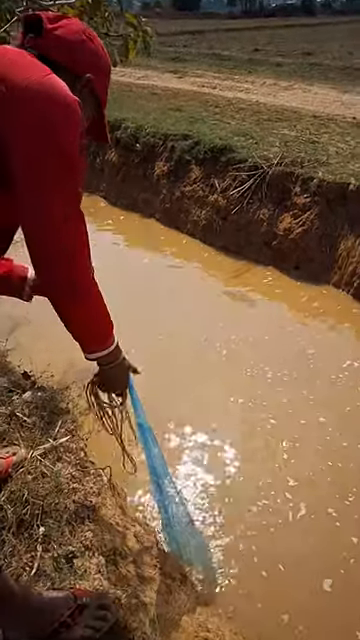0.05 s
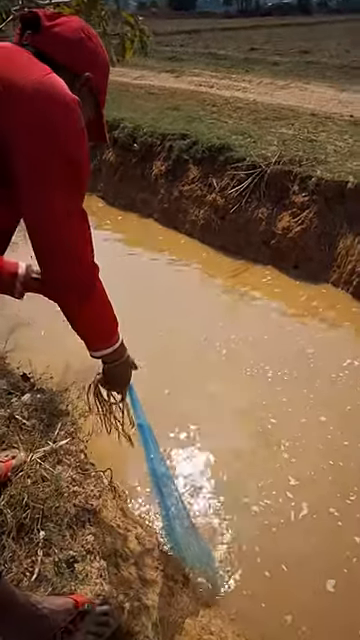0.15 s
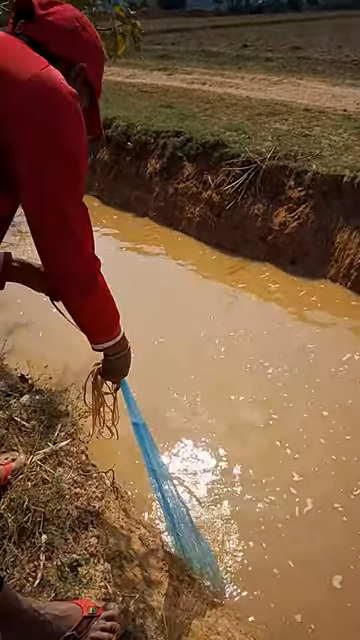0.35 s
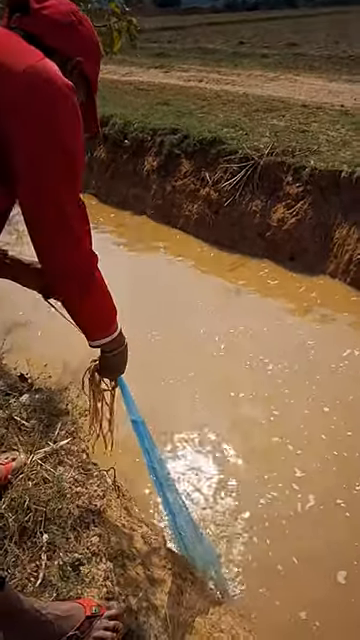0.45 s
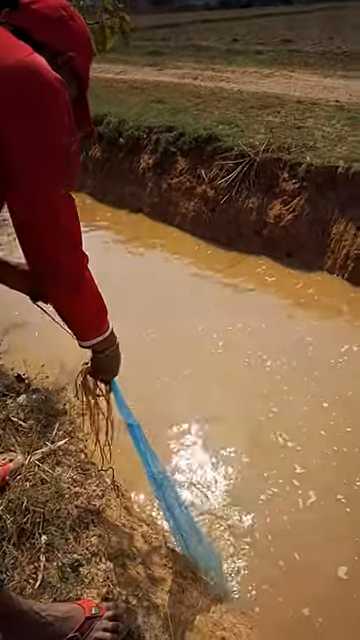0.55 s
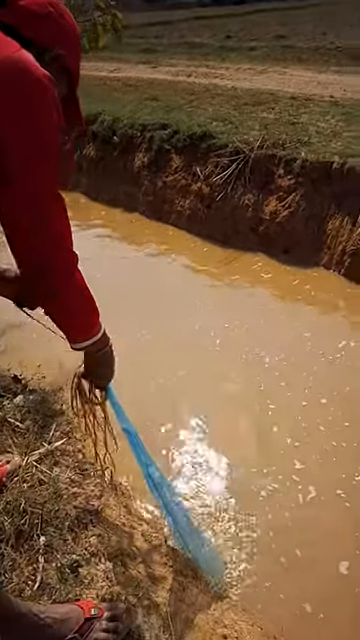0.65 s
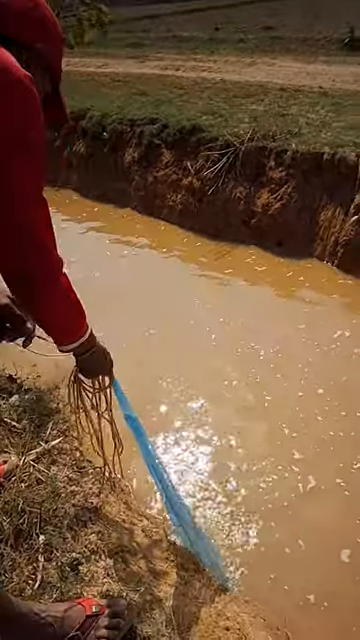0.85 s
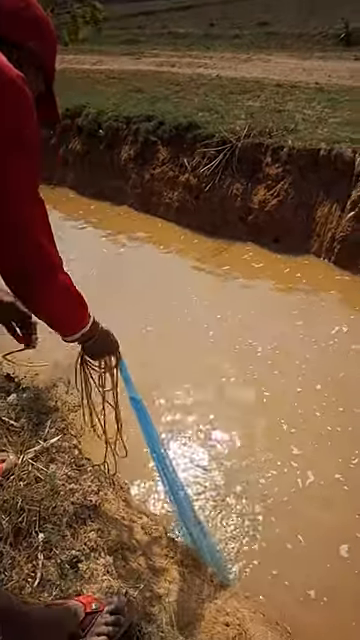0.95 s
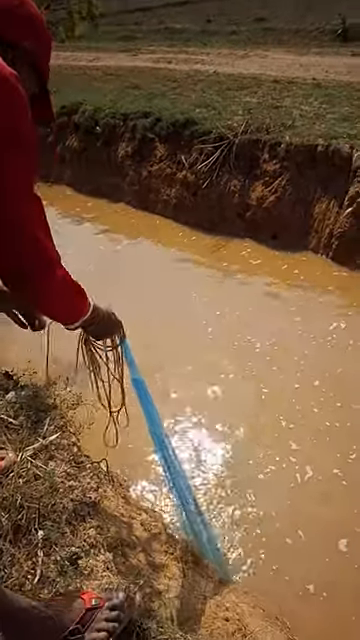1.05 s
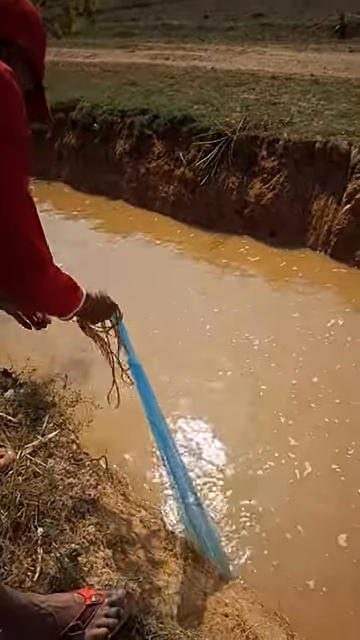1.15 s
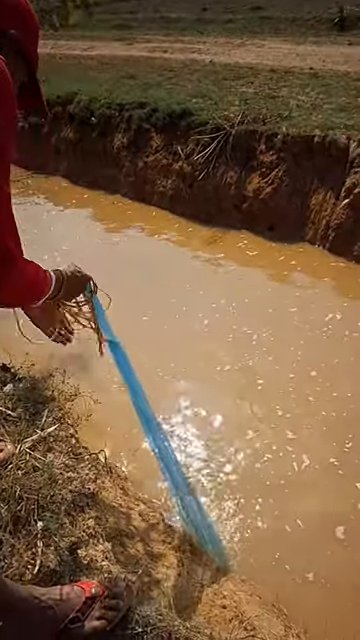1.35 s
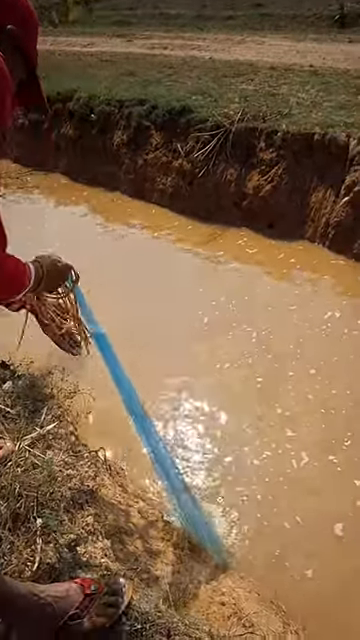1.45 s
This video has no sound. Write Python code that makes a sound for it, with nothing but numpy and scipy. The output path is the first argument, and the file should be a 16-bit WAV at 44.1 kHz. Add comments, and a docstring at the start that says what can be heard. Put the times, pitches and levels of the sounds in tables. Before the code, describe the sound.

Wind buffets the microphone with a low, uneven rumble, then drops to a soft flutter. Faint birds whistle far off over a light hiss in open farmland, and a wet net makes a few tiny ticks and plops.

```python
"""Open farmland beside a muddy ditch. A gust buffets the two microphone ports and drops to a low
flutter; its turbulent pressure is only weakly correlated between them, so each hears its own wind.
A wet net is drawn in with a few ticks (noise bursts) and small plops (damped modes in the water).
Small birds whistle far off in gliding tones, over a steady hiss with a fine rustle of dry grass."""
import sys
import numpy as np
from scipy import signal
from scipy.fft import rfft, irfft
from scipy.io import wavfile
from scipy.ndimage import uniform_filter1d

SR = 44100
rng = np.random.default_rng(int(sys.argv[2]) if len(sys.argv) > 2 else 0)


def wrap_up_sound(samples):
    """Save the sound to the file named by the first command line argument, as 16-bit audio."""
    columns = np.atleast_2d(samples).T
    # keep every value between -1 and 1, then stretch to whole-number steps
    tamed = np.clip(columns, -1, 1)
    steps = np.round(tamed * 32767).astype(np.int16)
    wavfile.write(sys.argv[1], SR, steps)


N = 66150
TIME = np.arange(N) / SR


# Wind pressure on the ports: time_s, left_db, right_db
GUST_LEVELS = [(0.0, -41, -63), (0.04, -37.5, -42.5), (0.075, -49.5, -57), (0.105, -37.5, -40.5),
               (0.185, -53, -42), (0.215, -40, -29.5), (0.285, -35.5, -45), (0.31, -35, -62),
               (0.35, -44.5, -93), (0.37, -27.5, -33), (0.42, -23, -24.5), (0.47, -33, -30),
               (0.515, -31, -25.5), (0.54, -48, -62), (0.572, -38.5, -28.5), (0.63, -38, -55),
               (0.655, -40.5, -71), (0.69, -37.5, -57), (0.735, -56.5, -81), (1.0, -55.5, -92),
               (1.22, -56.5, -82), (1.265, -46.5, -89), (1.292, -34.5, -47), (1.325, -45, -74),
               (1.435, -49.5, -83), (1.475, -44, -56), (1.5, -71, -60)]
# Spectrum of the deep eddies: frequency_hz, density_db
RUMBLE_SPECTRUM = [(15, -8), (35, -13), (62, 3), (88, -4), (125, -9), (170, -21), (250, -25), (400, -42),
                   (700, -49.5), (1500, -63)]

def gust_rumble(trim_db=-2.5):
    """Turbulent pressure: eddies rumble on each port as strongly as the gust presses on it."""
    return from_db(in_time(GUST_LEVELS) + trim_db) * eddies(RUMBLE_SPECTRUM)


# Large single eddies: centre_s, left_db, right_db
EDDY_THUMPS = [(.419, -25, -27), (.507, -27, -27), (.617, -32, -40), (1.14, -45, -70), (1.463, -43, -62)]

def eddy_thumps(pitch_hz=60, half_width_s=0.0088):
    """Pressure pulse: one large eddy swings the pressure at the ports through about one cycle."""
    return sum(from_db([[left_db], [right_db]]) * gaussian(centre_s, half_width_s)
               * np.sin(2 * np.pi * pitch_hz * (TIME - centre_s))
               for centre_s, left_db, right_db in EDDY_THUMPS)


# Sharp buffets within the gust: centre_s, half_width_s, left_db, right_db
GUST_BUFFETS = [(0.224, 0.02, -39, -36.5), (0.272, 0.0168, -43, -39), (0.397, 0.033, -47, -41),
                (0.457, 0.028, -32, -35.5), (0.572, 0.012, -41, -34.5), (0.608, 0.0094, -38.5, -48),
                (0.631, 0.014, -33, -48), (1.289, 0.0083, -47, -63)]
# Spectrum of the buffets: frequency_hz, density_db
BUFFET_SPECTRUM = [(40, 1), (80, -6), (120, 5.5), (170, -2.5), (230, -3.5), (320, -9.5), (480, -25.5),
                   (900, -41)]

def gust_buffets():
    """Intermittency: turbulence strikes the ports in brief, low bursts."""
    push = sum(from_db([[left_db], [right_db]]) * gaussian(centre_s, half_width_s)
               for centre_s, half_width_s, left_db, right_db in GUST_BUFFETS)
    return push * eddies(BUFFET_SPECTRUM)


# Strength of the flutter at the ports: time_s, level_db
FLUTTER_LEVELS = [(0, -50.5), (.05, -62.5), (.08, -52.5), (.19, -59), (.213, -45), (.25, -59.5),
                  (.288, -46), (.305, -50.5), (.352, -67), (.372, -51.5), (.44, -47), (.465, -51.5),
                  (.49, -59), (.515, -52), (.542, -61), (.568, -39.5), (.61, -51.5), (.635, -39),
                  (.652, -60), (.715, -45.5), (.76, -77), (.79, -54), (.82, -51.5), (.87, -68.5),
                  (1.05, -70), (1.08, -59.5), (1.26, -64), (1.29, -55), (1.32, -61.5), (1.5, -74)]
# Spectrum of the flutter: frequency_hz, density_db
FLUTTER_SPECTRUM = [(100, -28), (205, -21.5), (270, -3), (340, -1), (430, -5), (540, -15), (750, -27),
                    (1300, -43), (3000, -52)]

def port_flutter(trim_db=-3.5):
    """Amplitude modulation: a higher band of turbulence flutters, louder on the right."""
    turbulence = eddies(FLUTTER_SPECTRUM, correlation=0.064, smoothing_s=0.028)
    return from_db(in_time(FLUTTER_LEVELS) + trim_db) * turbulence * pan(-3)


# Ticks of the wet net: start_s, level_db, decay_s
NET_TICKS = [(.059, -45.5, 0.0098), (0.601, -49.5, 0.0032), (1.4031, -39, 0.0016)]
# Spectrum of a tick, shared by the grass rustle: frequency_hz, density_db
TICK_SPECTRUM = [(500, -18), (1500, -9), (2800, 1), (4500, -4), (7200, 1), (12000, -1), (16000, -4)]

def net_ticks():
    """Broadband transients: each tick of the net starts at once and decays exponentially."""
    bursts = sum(from_db(level_db) * (TIME >= start_s) * np.exp(-np.abs(TIME - start_s) / decay_s)
                 for start_s, level_db, decay_s in NET_TICKS)
    return bursts * colour(noise_pair(correlation=0.067), TICK_SPECTRUM)


# Plops in the water: start_s, level_db
WATER_PLOPS = [(.071, -45), (.121, -54.5), (0.208, -58), (.626, -61)]
# Nominal resonances of a plop: pitch_hz, gain_db, t60_s
WATER_MODES = [(307, -1.5, 0.12), (467.4, -3.5, 0.15), (701, -1.5, .05), (1126, 3.5, 0.024),
               (1331, -1.5, 0.072)]

def water_plops(attack_s=0.0022):
    """Damped resonance: each plop rings in a few modes, their pitch and level varied at random."""
    plops = np.zeros(N)
    for start_s, level_db in WATER_PLOPS:
        age = np.maximum(TIME - start_s, 0)
        onset = 1 - np.exp(-age / attack_s)
        for k, (pitch_hz, gain_db, t60_s) in enumerate(WATER_MODES):
            decay = from_db(level_db + gain_db + rng.normal(0, 3.2) - 60 * age / t60_s)
            detuned_hz = pitch_hz * rng.uniform(0.918, 1.04)
            plops += (-1) ** k * onset * decay * np.sin(2 * np.pi * detuned_hz * age)
    return from_left(plops, lag_s=0.00012)


# Bird notes: start_s, length_s, start_hz, middle_hz, end_hz, level_db, trill_depth_hz
BIRD_NOTES = [(.086, .03, 3650, 4150, 5000, -56, 230), (.108, .03, 5000, 4500, 3700, -54, 230),
              (.13, .065, 3900, 3050, 2700, -63, 330), (.455, .065, 3300, 3280, 3020, -64, 20),
              (.507, .05, 4150, 4750, 4880, -62.5, 60), (.553, .065, 4900, 4650, 4000, -65, 60),
              (.64, .085, 2800, 2570, 2490, -61.5, 12), (.712, .12, 2500, 2420, 2410, -67, 10),
              (.892, .128, 3260, 3150, 3130, -63.5, 130), (1.122, .03, 5180, 5000, 4830, -58.5, 20),
              (1.15, .07, 4750, 4600, 4740, -71, 30), (1.262, .055, 3500, 3620, 3960, -59.5, 25),
              (1.305, .04, 3950, 3620, 3150, -60, 30), (1.338, .045, 3230, 2950, 2740, -66, 30),
              (1.452, .046, 2850, 2650, 2540, -66, 30)]

def bird_whistles(trim_db=-1.5, trill_rate_hz=58, edge_share=0.22, waver_db=1.8):
    """Frequency modulation: thin tones glide and trill, with a faint scatter from the fields."""
    song = np.zeros(N)
    jitter_hz = 35 * drift(204)
    trill = tone(trill_rate_hz * (1 + 0.206 * drift(21.3))) + 0.415 * drift(148)
    for start_s, length_s, start_hz, middle_hz, end_hz, level_db, trill_depth_hz in BIRD_NOTES:
        progress = np.clip((TIME - start_s) / length_s, 0, 1)
        glide = np.polyfit([0, .5, 1], [start_hz, middle_hz, end_hz], 2)
        pitch_hz = np.polyval(glide, progress) + trill_depth_hz * trill + jitter_hz
        swell = np.clip(np.minimum(progress, 1 - progress) / edge_share, 0, 1)
        song += from_db(level_db + trim_db) * swell * np.sqrt(2) * tone(pitch_hz)
    song *= from_db(waver_db * drift(63))
    return from_left(song, lag_s=0.00005) + field_echo(song)


def field_echo(sound, gain_db=-6, t60_s=0.3):
    """Diffuse scattering: the fields return a dense tail that decays exponentially."""
    tail = rng.standard_normal((2, N)) * from_db(-60 * TIME / t60_s)
    response = unit_power(tail) / np.sqrt(N)
    return from_db(gain_db) * signal.fftconvolve(sound[None], response, axes=1)[:, :N]


# Spectrum of the hiss from all around: frequency_hz, density_db
DIFFUSE_SPECTRUM = [(100, -17), (400, 6.5), (750, -4), (1200, -1), (1600, -2.5), (2600, -1), (4500, 2),
                    (6300, 0.5), (8000, -2.5), (11000, -1.5), (15500, -4)]

def diffuse_hiss(gain_db=-0.5, waver_db=1, treble_hz=6500):
    """Diffuse field: the ports hear nearly independent noise, the right one brighter."""
    air = colour(noise_pair(correlation=0.033), DIFFUSE_SPECTRUM)
    air *= from_db(gain_db + waver_db * drift(7.6))
    treble = signal.sosfilt(signal.butter(1, treble_hz, "high", fs=SR, output="sos"), air)
    return air + treble * (pan(-2) - 1)


# Spectrum of the hiss from the left: frequency_hz, density_db
LEFT_HISS_SPECTRUM = [(200, -20), (700, 1), (1200, -1), (2500, -0.5), (4500, -9), (8000, 1), (15000, -10)]

def left_hiss(gain_db=-6.5):
    """Coherent arrival: one noise reaches both ports, the left one first."""
    noise = colour(rng.standard_normal(N), LEFT_HISS_SPECTRUM)
    return from_db(gain_db) * from_left(noise, lag_s=0.000376)


def grass_rustle(grains_per_s=310, gain_db=-18):
    """Shot noise: tiny ticks of dry grass fall at random and merge into a rustle."""
    size_db = np.minimum(rng.exponential(1, N), 3)
    grains = (rng.random(N) < grains_per_s / SR) * from_db(size_db) * rng.choice([-1, 1], (2, N))
    return from_db(gain_db) * colour(grains, TICK_SPECTRUM)


# Common gain of hiss and rustle: time_s, gain_db
BACKGROUND_GAIN = [(0, -53), (.12, -52.5), (.34, -56.5), (.41, -54.5), (.5, -53), (.57, -54.5),
                   (.63, -54.5), (.73, -58.5), (1.0, -59), (1.22, -58), (1.32, -57.5), (1.37, -55.5),
                   (1.5, -58.5)]

def background():
    """Common modulation: hiss and rustle sink together as the gust passes."""
    return from_db(in_time(BACKGROUND_GAIN)) * (diffuse_hiss() + left_hiss() + grass_rustle())


def eddies(spectrum, correlation=0.13, smoothing_s=0.04):
    """Turbulent pressure, divided by its running amplitude so that the gust sets its level."""
    pressure = colour(noise_pair(correlation), spectrum)
    width = int(smoothing_s * SR)
    power = uniform_filter1d(uniform_filter1d(pressure ** 2, width), width // 2)
    return unit_power(pressure / np.sqrt(np.abs(power) + 1e-6))


def colour(x, spectrum):
    """Spectral shaping to unit power, rolling off beyond the ends of the spectrum."""
    hz, db = np.transpose(spectrum)
    f = np.maximum(np.arange(N // 2 + 1) * SR / N, 1)
    rolloff = np.minimum(f / hz[0], 1) * np.minimum(hz[-1] / f, 1) ** 2
    gain = from_db(np.interp(np.log(f), np.log(hz), db))
    return unit_power(irfft(rfft(x) * rolloff * gain, N))


def noise_pair(correlation):
    """Partial coherence: two white noises share a common part."""
    mid, side = rng.standard_normal((2, N))
    return np.sqrt(1 + correlation) * mid + np.sqrt(1 - correlation) * side * np.array([[1], [-1]])


def drift(rate_hz):
    """Low-pass noise: a random wander of unit power."""
    f = np.arange(N // 2 + 1) * SR / N
    return unit_power(irfft(rfft(rng.standard_normal(N)) / (1 + (f / rate_hz) ** 2), N))


def tone(hz):
    """A sine whose phase is the integral of its frequency."""
    return np.sin(2 * np.pi * np.cumsum(hz) / SR)


def gaussian(centre_s, half_width_s):
    """A bell envelope, down to 1/e at the half width."""
    return np.exp(-((TIME - centre_s) / half_width_s) ** 2)


def from_left(x, lag_s):
    """Path difference: the sound reaches the right port later."""
    return np.array([x, np.interp(TIME - lag_s, TIME, x)])


def pan(left_minus_right_db):
    """Level difference as left and right gains."""
    return from_db(np.array([[1], [-1]]) * left_minus_right_db / 2)


def in_time(rows):
    """Linear interpolation in time, one track per level column."""
    time_s, *columns = np.transpose(rows)
    return np.array([np.interp(TIME, time_s, column) for column in columns])


def from_db(db):
    """Decibels to amplitude ratio."""
    return 10 ** (np.asarray(db) / 20)


def unit_power(x):
    """Normalisation to a mean square of one."""
    return x / np.sqrt(np.mean(x ** 2) + 1e-20)


def scene():
    """Superposition: the pressures of all sources add at each port."""
    wind = gust_rumble() + eddy_thumps() + gust_buffets() + port_flutter()
    return wind + background() + bird_whistles() + net_ticks() + water_plops()


def record(dry):
    """Band limiting: a steep low-pass removes the highest treble."""
    cutoff_hz = 15900
    f = np.arange(N + 1) * SR / (2 * N)
    return irfft(rfft(dry, 2 * N) / np.sqrt(1 + (f / cutoff_hz) ** 400), 2 * N)[:, :N]


dry = scene()
out = record(dry)
wrap_up_sound(out)
```